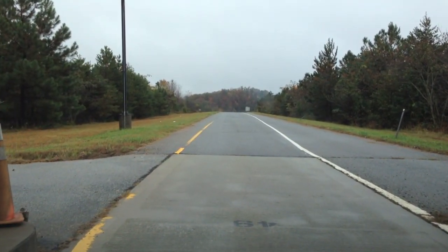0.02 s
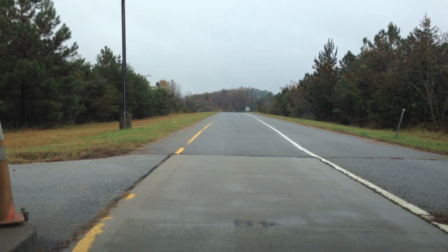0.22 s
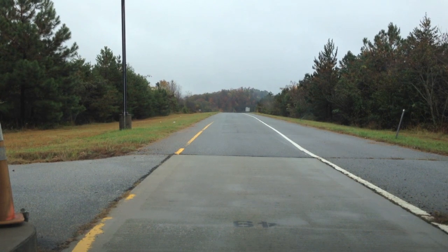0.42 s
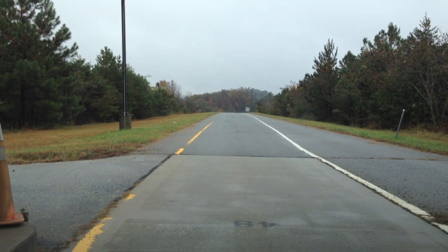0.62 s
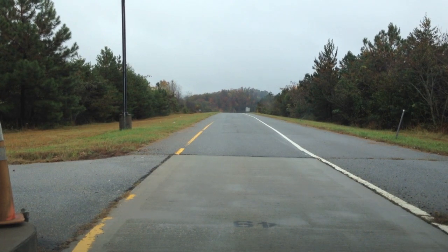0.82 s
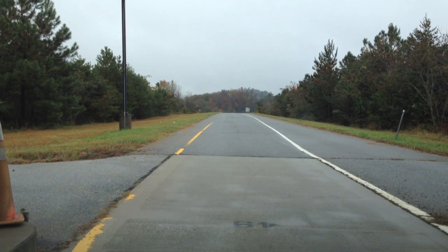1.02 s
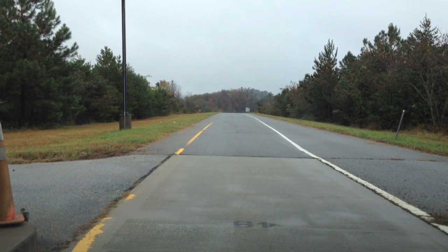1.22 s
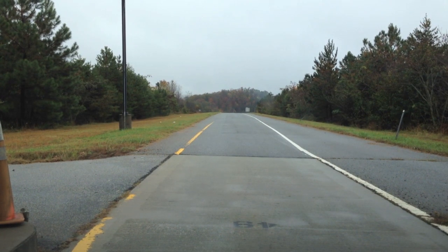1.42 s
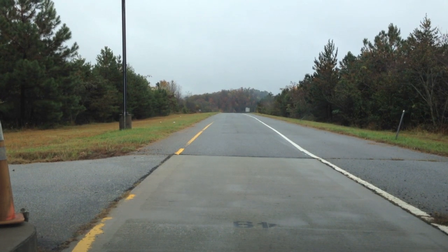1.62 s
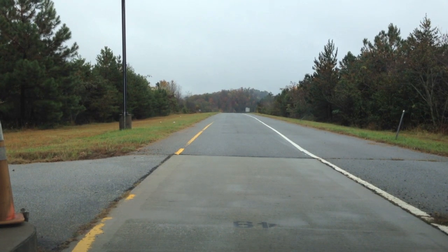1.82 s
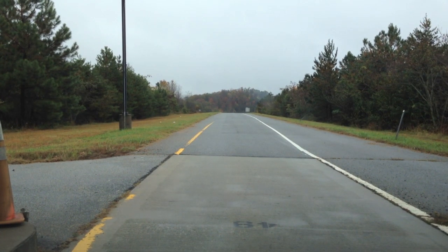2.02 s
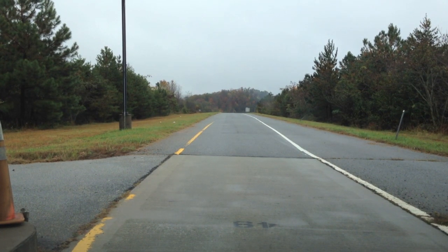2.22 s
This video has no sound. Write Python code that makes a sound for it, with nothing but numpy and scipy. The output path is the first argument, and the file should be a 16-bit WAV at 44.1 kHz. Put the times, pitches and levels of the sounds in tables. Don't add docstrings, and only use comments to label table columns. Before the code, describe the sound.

Coins clatter and slide in a hard machine tray after a hollow thump and sharp knock

```python
import sys
import numpy as np
from scipy import signal
from scipy.fft import rfft, irfft, next_fast_len
from scipy.io import wavfile
from scipy.ndimage import map_coordinates

SR = 44100
rng = np.random.default_rng(int(sys.argv[2]) if len(sys.argv) > 2 else 0)


def magnitude_from_level(level_db):
    exponent = np.asarray(level_db, float) / 20
    return 10 ** exponent


def wav_record(signal):
    frames = np.transpose(np.atleast_2d(signal))
    bounded = np.clip(frames, -1, 1)
    quanta = np.round(bounded * 32767).astype(np.int16)
    wavfile.write(sys.argv[1], SR, quanta)


N = 101430

# [f/Hz, level/dB]
METAL_CLICK = [(1500, -23), (3700, -8.5), (5620, -0.5), (8500, -6.5), (9800, -0.5), (11400, -14.5),
               (15000, -12)]


def unit(x):
    return x / np.sqrt(np.mean(x ** 2) + 1e-20)


def filtered(x, response):
    m = next_fast_len(N + SR // 2)
    return irfft(rfft(x, m) * response(np.fft.rfftfreq(m, 1 / SR)), m)[:N]


def coloured(x, points):
    f, db = np.transpose(points)
    grid = np.fft.rfftfreq(8192, 1 / SR)
    curve = np.interp(np.log(grid + 1), np.log(f), db)
    ceps = irfft(np.log(magnitude_from_level(curve) + 1e-6))
    ceps[1:4096] *= 2
    ceps[4097:] = 0
    h = irfft(np.exp(rfft(ceps)))
    return signal.fftconvolve(x, h / np.linalg.norm(h))[:N]


def body(x, peaks):
    def sums(f):
        total = 0
        for k, (centre, width, db) in enumerate(peaks):
            peak = 1j * f * width / (centre * centre - f * f + 1j * f * width)
            total = total + (-1) ** k * magnitude_from_level(db) * peak
        return total

    return filtered(x, lambda f: sums(f) / np.sqrt(np.mean(abs(sums(f)) ** 2)))


def wobble(rate):
    knots = rng.standard_normal(int(N * rate / SR) + 4)
    return map_coordinates(knots, [np.arange(N) * rate / SR])


def rattles(rows, rate, rise, first=1.2):
    out = np.zeros(N + SR)
    t = np.arange(SR // 4) / SR
    for s, db, length in rows:
        chance = rng.random(len(t))
        size = rng.standard_normal(len(t))
        sign = np.sign(rng.standard_normal(len(t)))
        contact = np.clip((rate / SR - chance) * SR / rate * 4, 0, 1)
        hit = contact * sign * magnitude_from_level(3 * size)
        hit *= 1 - np.exp(-t / (rise * length + 1e-5))
        hit[0] = first
        fade = magnitude_from_level(db - 7.15 * (t / length) ** 1.85)
        out[round(s * SR):][:len(t)] += fade * hit * np.sqrt(SR / rate)
    return out[:N]


def notes(rows, rise_s, rough_db, beat, wander=0):
    out = np.zeros(N)
    for start, hz, db, t60 in rows:
        t = np.clip(np.arange(N) / SR - start, 0, None)
        shake = wobble(160)
        drift = wander * np.cumsum(shake[::-1] * (t > 0)) / SR
        turn = 2 * np.pi * hz * (t + drift)
        partner = np.sin(turn + 2 * np.pi * 37.6 * t)
        pair = np.sin(turn) + beat * hz / 15500 * partner
        level = magnitude_from_level(db - 60 * t / t60 + rough_db * shake)
        out = out + level * (1 - np.exp(-t / rise_s)) * pair
    return out


def coin_clacks():
    # [t/s, clack level/dB, rattle length/s, click level/dB]
    landings = [(.067, -49, 0.0045, -45), (0.101, -40, 0.005, -49), (.547, -46, 0.0093, -68),
                (1.578, -69, 0.0073, -58), (1.613, -37.5, 0.0058, -49.5), (1.685, -42, 0.021, -61),
                (1.792, -46, 0.0071, -53), (1.8197, -40, 0.012, -35), (1.9155, -28.5, 0.0091, -32.5),
                (1.928, -30, 0.0071, -34), (1.9509, -28, 0.011, -27.5), (1.982, -34, 0.0084, -39),
                (2.0108, -35.5, 0.0065, -31.5), (2.043, -40.5, 0.013, -39.5), (2.1043, -41.5, 0.0066, -38),
                (2.205, -45.5, 0.048, -45.5), (2.266, -50, 0.0087, -44), (2.2788, -44, 0.013, -36.5)]
    # [f/Hz, width/Hz, level/dB]
    tray = [(650, 48, -2), (913, 65, 1.5), (1082, 39, -0.5), (1323, 52, 2.5), (1617, 89, -0.5),
            (2090, 370, -9), (2615, 49, -9), (2840, 45, -16.5)]
    s, clack_db, length, click_db = np.transpose(landings)
    clack = body(rattles(zip(s, clack_db, length), 2680, 0.01, first=3.05), tray)
    click = rattles(zip(s, click_db, 0.29 * length), 13600, 0.067, first=1.5)
    fizz = rattles(zip(s, click_db, 1.87 * length), 12600, 0.036)
    return magnitude_from_level(-5.5) * clack + magnitude_from_level(-6.5) * coloured(click + magnitude_from_level(-10.5) * fizz, METAL_CLICK)


def coin_slides():
    # [t/s, level/dB, length/s]
    slides = [
        (2.115, -29.5, 0.023),
        (2.147, -32.5, 0.02),
        (2.162, -39.5, 0.035),
        (2.202, -44, 0.027),
        (2.262, -41, 0.077),
    ]
    # [f/Hz, width/Hz, level/dB]
    pile = [(1800, 170, 8.5), (2500, 87, 7.5), (3460, 100, 5), (3682, 29, -11), (3940, 85, 8),
            (4378, 63, 6.5), (5060, 180, -0.5), (7400, 770, 1.5), (8600, 370, -4), (14400, 930, -2.5)]
    slide = rattles(slides, 9500, 0.18, first=0)
    scrape = magnitude_from_level(-10) * coloured(slide, METAL_CLICK)
    return magnitude_from_level(-7.5) * (body(slide, pile) + scrape)


def coin_rings():
    # [t/s, f/Hz, level/dB, time to fall 60 dB/s]
    rings = [(1.83, 14750, -61, 0.45), (1.918, 9300, -47, .08), (1.94, 9460, -48, 0.18),
             (.548, 5680, -45, 0.055), (2.011, 8740, -36, 0.072), (2.011, 14690, -36, 0.047),
             (2.118, 14800, -43, 0.13), (2.183, 14800, -55, .12), (2.203, 14690, -56, 0.67),
             (2.117, 3680, -38.5, 0.12), (2.118, 3424, -37.5, 0.13), (2.121, 7165, -49, .06),
             (2.134, 1900, -35.5, 0.13), (2.148, 3450, -40, 0.11), (2.163, 3700, -38, 0.059),
             (2.165, 2430, -46, 0.093), (2.174, 4378, -41, 0.1), (2.267, 6600, -47, 0.11)]
    return notes(rings, rise_s=0.0025, rough_db=2.8, beat=0.25, wander=0.006)


def jingles():
    # [t/s, f/Hz, level/dB, time to fall 60 dB/s]
    tray_notes = [(1.793, 1050, -40, 0.05), (1.822, 1300, -40.5, 0.082), (1.864, 1310, -44, 0.066),
                  (1.88, 1310, -53, 0.073), (1.9155, 657, -37, .1), (1.9155, 900, -35, .08),
                  (1.9155, 1545, -33, .05), (1.928, 660, -39.5, .1), (1.928, 1310, -39, 0.044),
                  (1.9505, 1324, -26, 0.051), (1.9505, 1599, -28.5, 0.056), (1.953, 678, -40, 0.15),
                  (1.953, 910, -44.5, .12), (2.011, 1650, -36, 0.046), (2.011, 2520, -45.5, 0.093),
                  (2.042, 960, -37, 0.076), (2.045, 2570, -44, 0.055), (2.101, 1100, -38, 0.085),
                  (2.123, 1668, -41, .1), (2.118, 3977, -46, 0.072), (2.12, 4992, -52, .08),
                  (2.148, 3687, -46, 0.072), (2.15, 4110, -46, .07), (2.165, 3020, -47, .07),
                  (2.164, 4005, -44.5, .07), (2.165, 3460, -40, .08), (2.165, 1827, -49, .12),
                  (2.203, 2500, -52, .2), (2.279, 2500, -43, .08), (2.279, 2180, -40.5, 0.068),
                  (2.279, 1300, -46.5, 0.091), (1.954, 2137, -40, .05), (1.982, 904, -42, .06),
                  (1.964, 676, -43, .06), (2.148, 5195, -53, .07), (1.82, 1940, -45, .04),
                  (2.122, 1800, -45, .07)]
    return notes(tray_notes, rise_s=0.002, rough_db=2.8, beat=0.25, wander=0.006)


def thumps():
    # [t/s, level/dB, contact length/s]
    touches = [
        (.24, -17.5, .016),
        (.258, -30.5, 0.043),
        (.295, -26.5, 0.013),
        (.433, -36.5, 0.047),
        (.51, -46, 0.1),
        (.583, -35, 0.021),
        (.677, -38, 0.015),
        (1.39, -34.5, 0.04),
    ]
    # [f/Hz, width/Hz, level/dB]
    trim = [(200, 176, -3), (300, 95, 3.5), (620, 152, -4.5), (870, 154, -4), (1167, 220, -15.5),
            (1610, 160, -19), (1900, 155, -21), (2490, 300, -24)]
    return magnitude_from_level(-4.5) * body(rattles(touches, 1770, 0.18, first=0), trim)


def panel_knock():
    # [t/s, level/dB, contact length/s]
    strikes = [
        (.468, -16, 0.0088),
        (.477, -24, 0.0025),
        (.486, -35.5, 0.013),
    ]
    # [f/Hz, width/Hz, level/dB]
    panel = [(560, 57.5, -6), (775, 330, -13), (1070, 100, -13), (1280, 136, -15.5), (1650, 220, -16),
             (1900, 80, -23.5), (2480, 95, -22.5), (2930, 98, -27)]
    return magnitude_from_level(-3.5) * body(rattles(strikes, 1990, 0.081, first=0), panel)


def dry_snaps():
    # [t/s, level/dB, length/s]
    ticks = [
        (.066, -37, 0.0032),
        (.101, -46, 0.0066),
        (.243, -49.5, 0.048),
        (.298, -54, 0.013),
        (.46, -45, 0.014),
        (.468, -23, 0.009),
        (.483, -65, 0.013),
        (.547, -43, 0.021),
        (.83, -48, 0.028),
        (1.39, -52, 0.027),
    ]
    # [f/Hz, level/dB]
    snap = [(1200, -15), (2000, -0.5), (3200, -15), (5200, -7.5), (5900, -4.5), (6600, -7), (15400, -33.5)]
    return magnitude_from_level(-4.5) * coloured(rattles(ticks, 9650, 0.093, first=0), snap)


def hollow_booms():
    # [t/s, f/Hz, level/dB, time to fall 60 dB/s]
    booms = [(0, 152, -45, 0.13), (.066, 188.4, -32.5, 0.11), (.234, 183, -22, 0.07),
             (.2435, 296, -19, 0.038), (.2655, 200, -22, 0.13), (.2985, 317, -22.5, 0.067),
             (.331, 230, -25.5, 0.041), (.4678, 358.6, -4.5, 0.056), (.4677, 268, -2, 0.037),
             (.4815, 205, -9.5, 0.07), (.472, 128.3, -20, 0.22), (.625, 183, -36, 0.073),
             (.765, 200, -31, 0.086), (.884, 167.5, -36, 0.095), (1.385, 153, -29.5, 0.042),
             (1.4, 200, -38.5, 0.29), (1.415, 389, -37.5, 0.17), (.299, 655, -29.5, 0.096),
             (1.915, 300, -37.5, 0.11), (.2475, 363, -14, 0.044), (.244, 910, -19.5, 0.037),
             (.486, 377, -17.5, 0.043), (.49, 564, -27, .05), (.509, 228, -26, 0.092),
             (.522, 372, -32, 0.063), (.53, 137, -29.5, 0.17), (.542, 300, -35, 0.089),
             (.549, 1183, -41.5, 0.11), (.584, 773, -37.5, 0.076), (.59, 560, -39, 0.1),
             (.59, 331, -35.5, 0.072), (.618, 780, -53, 0.045), (.681, 1007, -38, 0.085),
             (1.09, 367, -40, 0.12), (1.22, 195, -38.5, .12), (1.56, 160.4, -42.5, 0.11)]
    return notes(booms, rise_s=0.0025, rough_db=0.8, beat=0)


def engine():
    # [t/s, firing rate/Hz]
    idle = [(0, 23.49), (1, 23.48), (2.3, 23.64)]
    # [f/Hz, level/dB]
    exhaust = [(40, -54), (70, -12.5), (120, -4), (195, -7), (300, -21.5), (370, -15), (500, -29.5),
               (800, -65.5)]
    # [f/Hz, level/dB]
    drone_colour = [(25, -41), (60, -24.5), (120, -8), (200, -1.5), (300, -5.5), (372, -5.5), (450, -10.5),
                    (1300, -16), (2600, -36), (3300, -59.5)]
    s, hz = np.transpose(idle)
    cycles = np.cumsum(np.interp(np.arange(N) / SR, s, hz)) / SR
    fire = np.diff(np.floor(cycles + 0.3), prepend=0) > 0
    pulses = coloured(fire * magnitude_from_level(-0.3 * wobble(20)), exhaust)
    sway = magnitude_from_level(0.9 * (wobble(7.81) + wobble(28.91)))
    drone = unit(coloured(rng.standard_normal(N), drone_colour)) * sway
    return magnitude_from_level(-54.5) * unit(pulses) + magnitude_from_level(-49) * drone


def air():
    # [f/Hz, level/dB]
    hiss_colour = [(1500, 0), (2500, 2), (3000, -6), (3710, -4.5), (6420, 0), (9830, -12), (12000, -16.5),
                   (15000, -14)]
    # [t/s, level/dB]
    swell = [(0, -58), (.5, -58.5), (.65, -53.5), (.85, -52), (1.29, -56), (1.45, -60), (1.75, -58),
             (2.3, -53.5)]
    s, db = np.transpose(swell)
    level = np.interp(np.arange(N) / SR, s, db) - 4.0 + 0.48 * wobble(12.0)
    return unit(coloured(rng.standard_normal(N), hiss_colour)) * magnitude_from_level(level)


def cabin(x):
    t60 = 0.076
    t = np.arange(SR // 5) / SR
    tail = rng.standard_normal(len(t)) * magnitude_from_level(-60 * t / t60) * (t > 0.002)
    return x + magnitude_from_level(-6.5) * signal.fftconvolve(x, tail / np.linalg.norm(tail))[:N]


def scene():
    coins = coin_clacks() + coin_slides() + coin_rings()
    hand = thumps() + panel_knock() + dry_snaps()
    mix = cabin(coins + hand) + cabin(jingles())
    mix = mix - hollow_booms()
    return (mix + engine() + air())[None]


def roll_off(x):
    return signal.sosfilt(signal.butter(12, 16500, fs=SR, output="sos"), x)


def record(dry):
    low_hz, top_hz, above_db = 53.3, 15500, -34

    def microphone(f):
        bass_cut = (1j * f / (low_hz + 1j * f)) ** 2
        return bass_cut * np.where(f < top_hz, 1, magnitude_from_level(above_db))

    mix = filtered(dry[0], microphone)[None]
    return roll_off(mix)


dry = scene()
out = record(dry)
wav_record(out)
```